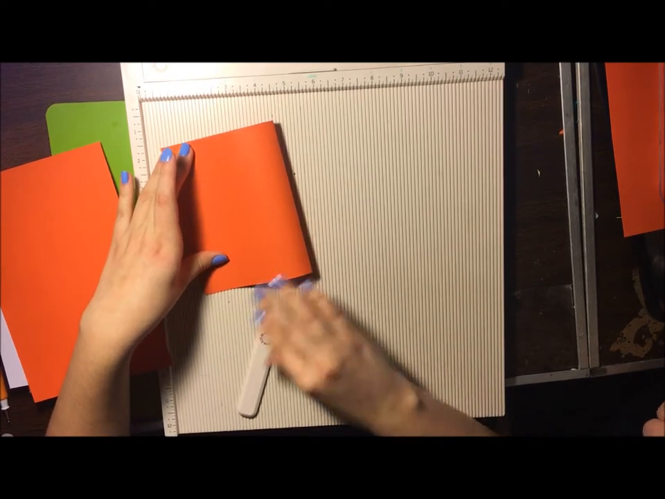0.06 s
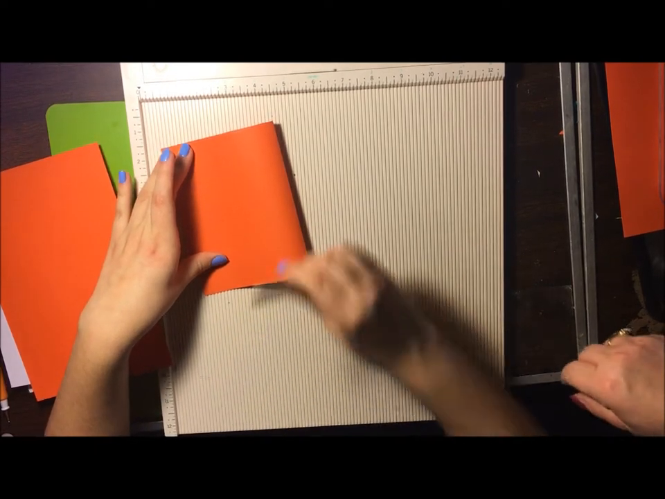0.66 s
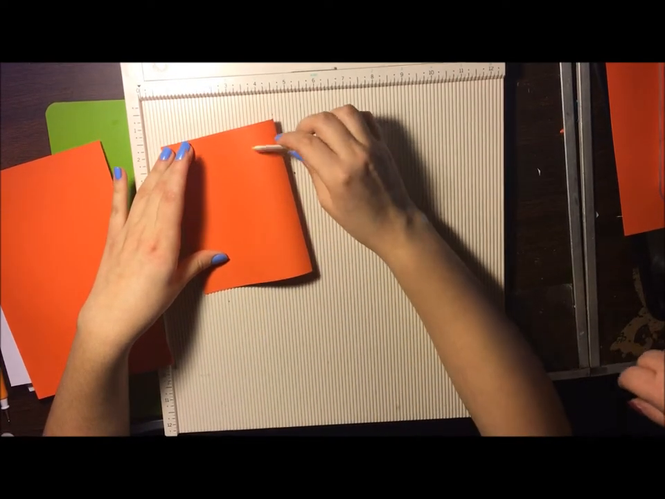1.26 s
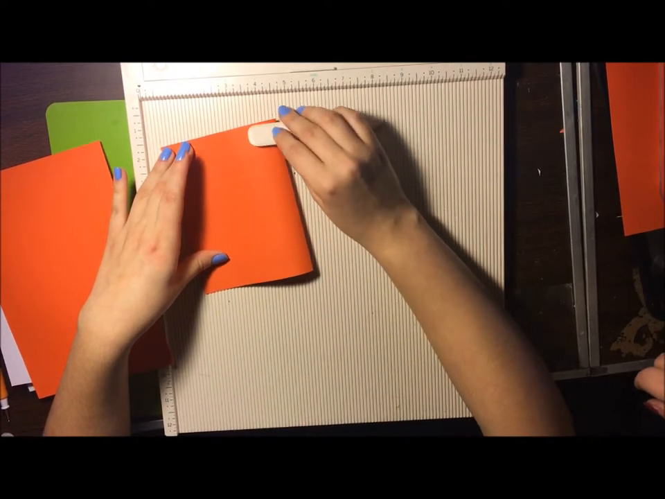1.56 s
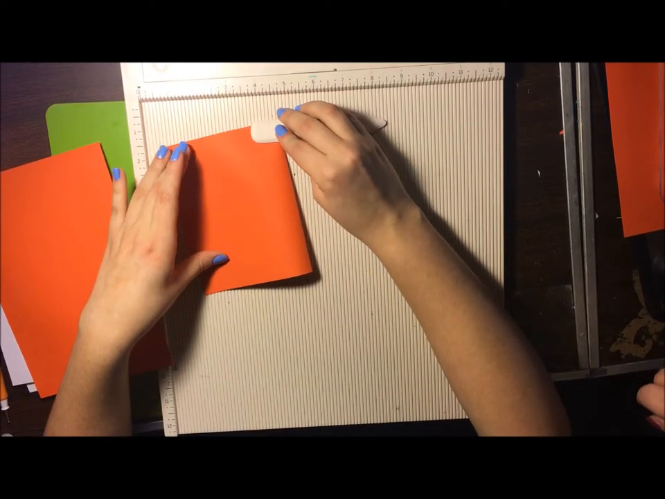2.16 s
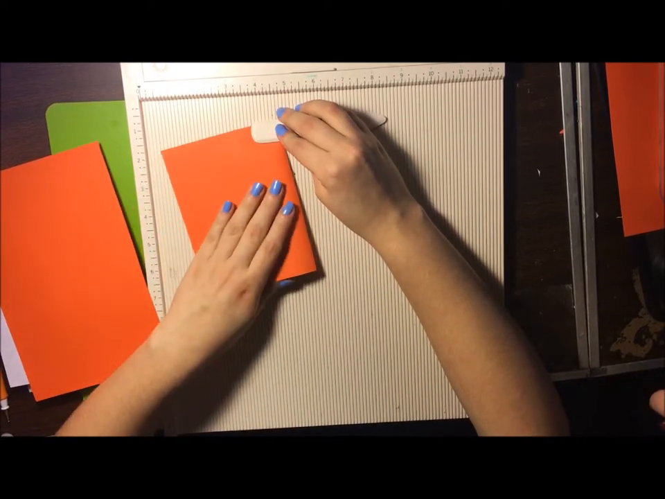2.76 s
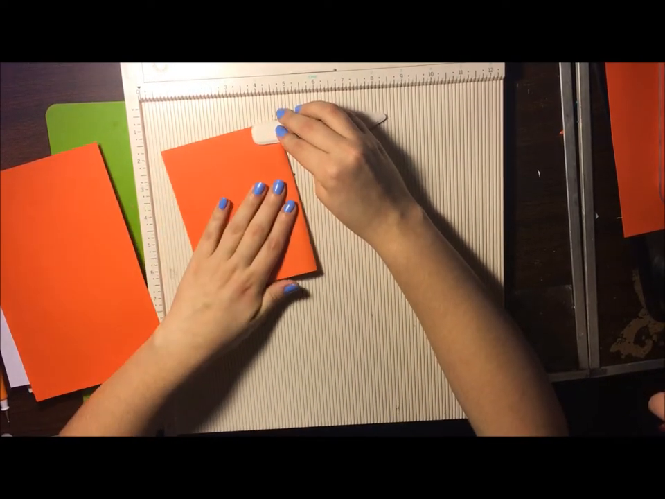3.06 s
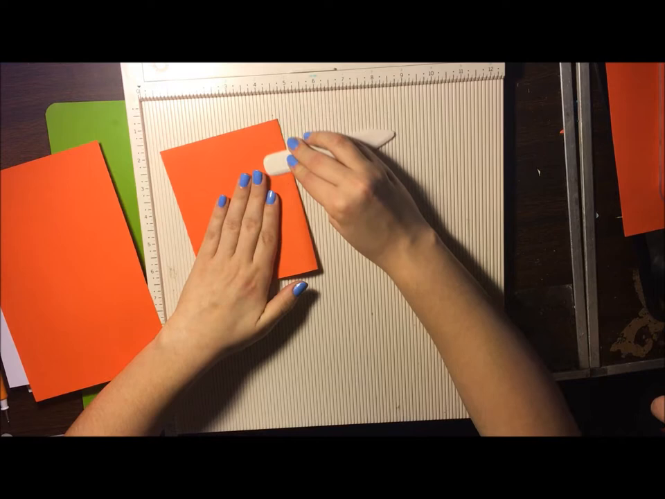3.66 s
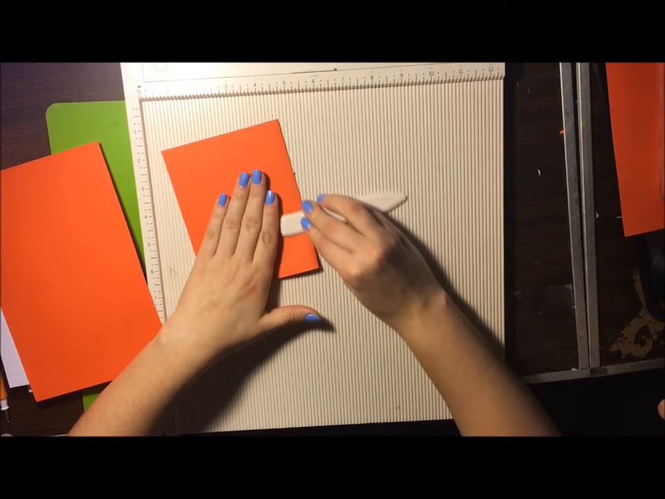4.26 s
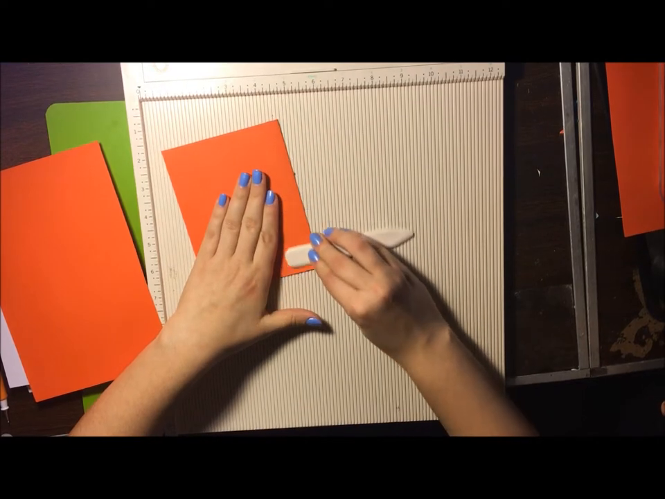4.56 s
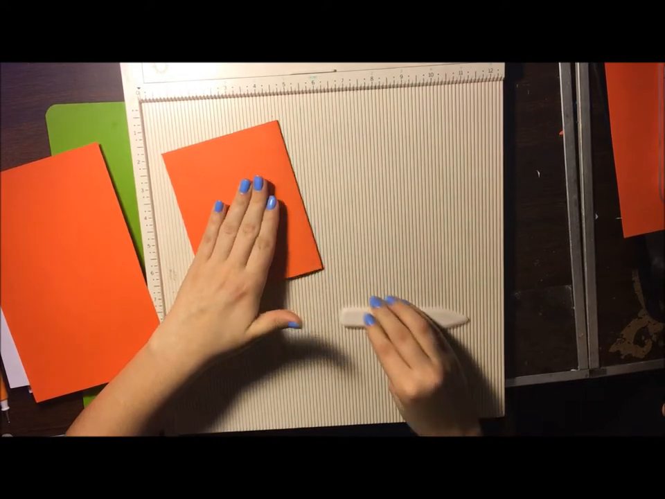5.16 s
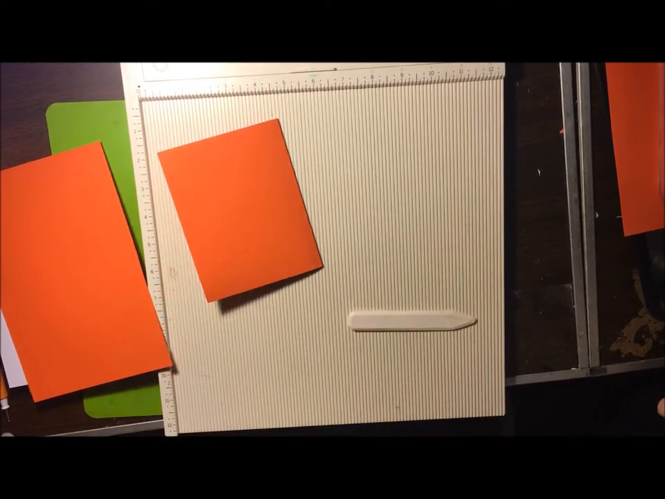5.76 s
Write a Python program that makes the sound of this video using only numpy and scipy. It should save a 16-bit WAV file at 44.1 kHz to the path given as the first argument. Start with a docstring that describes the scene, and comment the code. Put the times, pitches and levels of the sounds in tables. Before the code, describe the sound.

In the first 0.7 seconds fingers brush cardstock, and a bone folder clicks, scrapes and skids as it is lifted off a ribbed plastic board, with a tiny fingernail zip. Around 1.1 seconds come several hollow knocks with soft table thumps, one sharp and loudest, followed by short scrapes and a tap until 1.6. From there to about 3 seconds, hands slide over the card in dry swishes among faint ticks. From 3.2 to 5 seconds the folder is drawn along the crease in one soft, hissing rub, and the fold snaps once at 4 seconds. Near 4.9 the tool slips off the card and knocks the board. It scrapes and skids briefly, then is laid down with two clicks at 5.3. A faint tick follows at 5.7. The microphone is close, in a small room with a low rumble and faint electrical hum.

```python
"""Fingers brush card, then a bone folder clicks and scrapes as it is lifted off a ribbed plastic board.
It is knocked down beside a folded card and drawn along the crease, hissing; the fold snaps once.
The hollow scoring board rings under every knock and scrape, and hands slide on the cardstock.
At the end the folder slips off the card's edge and is laid down.
One microphone close to the table, in a small room with a low rumble and mains hum."""
import sys
import numpy as np
from scipy import signal
from scipy.fft import rfft, irfft
from scipy.io import wavfile
from scipy.ndimage import uniform_filter1d, map_coordinates

SR = 44100
rng = np.random.default_rng(int(sys.argv[2]) if len(sys.argv) > 2 else 0)


def dump(signal):
    """Clip the signal to [-1, 1] and save it as 16-bit WAV at the path in sys.argv[1]."""
    limited = np.clip(np.atleast_2d(signal).T, -1, 1)
    pcm = np.round(limited * 32767).astype(np.int16)
    wavfile.write(sys.argv[1], SR, pcm)


N = 264952
TAPS = 4096  # filter length in samples
HZ = np.fft.rfftfreq(TAPS, 1 / SR)
TIME = np.arange(N) / SR

# spectrum of the room tone: frequency_hz, relative_db
ROOM_AIR = [(15, -67.5), (25, -30), (49, -11.5), (86, -4.5), (116, -5), (164, -9), (188, -18.5),
            (281, -19.5), (445, -25), (804, -26.5), (871, -33), (945, -27.5), (3090, -34.5), (3440, -37.5),
            (15500, -46.5)]
# mains hum: pitch_hz, level_db
MAINS_HUM = [(61, -60), (120, -60.5)]
# first reflections off the table and things near it: delay_s, relative_gain
REFLECTIONS = [(.0016, 0.11), (.0094, 0.06), (0.0129, 0.22), (0.0256, 0.16)]
# decay of the small room: frequency_hz, t60_s
ROOM_DECAY = [(150, 0.47), (700, 0.2), (2000, 0.15), (6000, 0.13), (15000, 0.12)]
# dense floor of the board's response: frequency_hz, relative_db
BOARD_FLOOR = [(60, -18.5), (150, -16), (300, -10.5), (450, -13), (560, -3.5), (900, -1.5), (1900, -2.5),
               (3000, -11), (4900, -16), (6000, -16), (9500, -22), (10400, -24.5), (12500, -27.5),
               (16000, -38.5)]
# resonances of the board: pitch_hz, width_hz, above_floor_db
BOARD_RESONANCES = [(206, 53, 5), (359.6, 28, 13.5), (559, 4.5, 12), (630.3, 50, 14.5), (681, 38, 11),
                    (833, 68, 3), (942, 24, 11.5), (1150, 47, 9.5), (1310, 150, 7), (1508, 29, 5),
                    (1700, 22, 3), (1753, 64, 8), (1897, 57, 10), (2106, 130, 4), (2320, 360, 4.5),
                    (2680, 29, 8.5), (3480, 680, 6.5), (4370, 110, 8), (5640, 310, 4), (6570, 320, 4),
                    (8400, 330, -0.5), (9740, 350, 0)]
# the table giving under hand and tool: start_s, peak_db, pitch_hz, rise_s
TABLE_THUMPS = [(0.229, -39.5, 61, 0.019), (0.268, -41, 125.4, 0.0099), (0.287, -48.5, 354, 0.019),
                (0.975, -41, 54.6, 0.027), (1.059, -38, 70, 0.013), (1.149, -44.5, 198, .008),
                (3.595, -43, 71, 0.014), (4.884, -29.5, 219, 0.0056), (4.888, -40, 128, 0.011)]
# skin and card sliding over each other, and at 5.712 s the card springing back with a bright tick: start_s,
# length_s, end_level_db, swell_db, tilt_db_per_octave
CARD_TOUCHES = [(0, 0.095, -63, -10, -3.5), (.9, 0.024, -56, 7.5, -5), (1.654, 0.085, -60, 11.5, -2.5),
                (1.997, 0.022, -57, 3, -5.5), (2.221, 0.061, -65.5, -3, -2), (2.288, 0.039, -54, 1, -3.5),
                (2.337, 0.2, -52.5, 2, -2), (2.54, 0.19, -64, 2, -3), (2.82, 0.031, -71, 3, -1),
                (2.907, 0.045, -53, 10, -2), (3.498, 0.12, -60, -6, 0), (4.999, 0.074, -47.5, 10.5, -2.5),
                (5.071, 0.13, -55.5, -2, -3.5), (5.712, .006, -47.5, 0, 4.5)]
# hiss of paper fibres under a fingertip: frequency_hz, relative_db
FIBRE_HISS = [(300, -14), (700, -6.5), (1300, -3), (2000, 2), (3000, 1.5), (5000, -3), (6500, -1.5),
              (9700, -4), (10400, -9), (12500, -2), (15500, -11)]
# a fingernail running along folder or card: start_s, length_s, end_level_db, swell_db
NAIL_ZIPS = [(0.62, 0.0051, -61, 0), (0.637, 0.011, -51, -1), (0.648, 0.0099, -44.5, 3),
             (5.048, 0.164, -56, 0)]
# thin, sharp spectrum of the nail's zip: frequency_hz, relative_db
NAIL_COLOUR = [(400, -41), (1300, -6.5), (2300, -2.5), (2800, -11), (3600, 1), (4080, 5), (4900, -12),
               (7200, -17), (8600, -5.5), (10700, -8), (12300, -3), (15500, -15)]
# the folder skidding flat on the board: start_s, length_s, end_level_db, swell_db
FLAT_SKIDS = [(0.473, 0.012, -38, 16), (5.15, 0.11, -45.5, 17), (5.31, 0.015, -43.5, -9)]
# the folder's edge on the bare board: start_s, length_s, end_level_db, swell_db, bite_db (treble lift)
EDGE_SCRAPES = [(0.191, 0.061, -56, 7, 1), (.259, 0.094, -45.5, 2.5, -7), (.348, 0.061, -35, 15, -1.5),
                (0.476, 0.018, -32.5, 20, -9.5), (1.241, 0.047, -35, 15, -18.5),
                (1.297, 0.02, -43, 8, -11.5), (1.319, 0.029, -58.5, 6, 10), (1.467, .028, -40.5, 9, -13),
                (1.51, 0.094, -37, 9, -16), (4.983, 0.017, -46, 4, -17), (5.059, 0.16, -45, 6.5, -6),
                (5.213, 0.082, -49.5, 7, -6.5), (5.309, .026, -41, -7, -2.5)]
# knocks of folder and nails, and their tint: start_s, level_db, thud_db, hollow_db, edge_db
BOARD_KNOCKS = [(.03, -55, 30, 3.5, 2), (0.051, -54.5, 25, -7.5, 7), (0.186, -57.5, 30, -2, 1),
                (.2856, -37, 5, -4, 11.5), (0.2877, -39.5, 16, -0.5, -1), (.911, -59.5, 26, -3, 0),
                (1.0545, -30, 14, -16, 2.5), (1.07, -50, 19, -7, 13), (1.1097, -47.5, 25, -8, 7),
                (1.1467, -22.5, 0.5, -4.5, -2), (1.17, -40.5, 7, -6, -3), (1.4094, -35, -1, -0.5, -1.5),
                (1.456, -54.5, 0, -7, 7), (1.875, -52, 19, -10.5, -2), (1.903, -72, 21, 13.5, -5),
                (2.045, -55, 19, -13, -5.5), (2.182, -66.5, 23, 0, 13.5), (2.193, -57.5, 8, -21, 4),
                (2.2963, -47.5, 7, -39, -7), (2.489, -62.5, 28.5, 20.5, 12), (2.5237, -48, 14, -15, 6),
                (3.2528, -53.5, 24, -9, -27), (3.509, -64, 32, 18, 12), (4.0348, -34, -12, -18, -21),
                (4.8494, -45, -26, -1.5, -9), (4.8845, -34.5, 12.5, 2.5, 12.5), (5.308, -38, -1, -17, 2),
                (5.326, -37.5, -4, -1.5, -9), (5.713, -58, 15, -6.5, 17.5)]
# short ring of the card as the fold gives: pitch_hz, level_db, t60_s
FOLD_RING = [(1700, -29, 0.022), (2730, -24, 0.012), (3100, -35, 0.017)]
# effort of the long stroke down the crease: time_s, level_db
CREASE_EFFORT = [(3.19, -75.5), (3.39, -60.5), (3.47, -64.5), (3.55, -60), (3.9, -55), (4.122, -58),
                 (4.33, -51.5), (4.7, -57.5), (4.858, -55), (5.03, -58.5)]
# rubbing that the crease feeds into the board: frequency_hz, relative_db
CREASE_RUB = [(100, 15), (400, -0.5), (560, -4), (655, 0.5), (900, -5), (1400, -2), (1800, -0.5),
              (2100, -0.5), (3000, 0), (5000, 5.5), (9000, -4), (16000, 1)]
# hiss that the crease sends straight into the air: frequency_hz, relative_db
CREASE_AIR = [(500, -10), (2000, 3.5), (3500, 3.5), (4400, -6), (4950, -9.5), (5600, 0), (7600, -1),
              (9000, -2), (9700, 1.5), (10400, -7.5), (11400, -0.5), (13000, -5.5), (15500, -7)]


def amp(db):
    """Decibels to gain."""
    return 10 ** (np.asarray(db) / 20)


def unit(x):
    """Scales to an rms of 1."""
    return x / np.sqrt(np.mean(x ** 2) + 1e-20)


def curve(points, hz):
    """Joins (frequency_hz, value) points by lines on a log-frequency axis."""
    point_hz, value = np.transpose(sorted(points))
    return np.interp(np.log(hz + 1), np.log(point_hz + 1), value)


def causal(gain):
    """The impulse response of least delay that has this gain at HZ."""
    log_gain = np.log(np.maximum(gain, gain.max() * 1e-5))
    mirrored = np.concatenate([log_gain, log_gain[-2:0:-1]])
    return np.fft.ifft(np.exp(np.conj(signal.hilbert(mirrored)))).real


def colour(x, gain):
    """Passes x through a body with this gain; rms 1."""
    return unit(signal.oaconvolve(x, causal(gain))[:len(x)])


def stroke(time_s, level_db):
    """Envelope of one long stroke, silent outside it."""
    return uniform_filter1d(amp(np.interp(TIME, time_s, level_db, left=-200, right=-200)), size=90)


def push(start_s, length_s, end_db, swell_db, release_s, grip_s=0.0044, arch=2.06):
    """Envelope of one sliding move: it takes hold, arches to its end level and lets go."""
    t = np.arange(0, length_s + 8 * release_s, 1 / SR)
    to_go = np.maximum(1 - t / length_s, 0)
    grip = np.minimum(t / grip_s, 1)
    release = np.exp(-np.maximum(t - length_s, 0) / release_s)
    shape = grip * amp(end_db - swell_db * to_go ** arch) * release
    gain = np.zeros(N)
    span = gain[round(start_s * SR):][:len(t)]
    span += shape[:len(span)]
    return gain


def slips(per_s, spread_db, smooth):
    """Friction: tiny random slips of uneven size over a share of even rubbing noise."""
    size = amp(spread_db * np.minimum(rng.exponential(1, N), 4))
    train = size * rng.choice([-1, 1], N) * (rng.random(N) < per_s / SR)
    return unit(unit(train) + smooth * rng.standard_normal(N))


def wander(x, depth_db, patch_hz, patch_s):
    """As the contact point travels, different bands are favoured for a moment."""
    hz, t, spectra = signal.stft(x, SR, nperseg=512, noverlap=384)
    grid = np.meshgrid(hz / patch_hz, t / patch_s, indexing="ij")
    patches = map_coordinates(rng.standard_normal((128, 256)), grid, order=1, mode="mirror")
    spectra *= amp(depth_db * unit(patches))
    return unit(signal.istft(spectra, SR, nperseg=512, noverlap=384)[1][:N])


def room_tone(air_db=-56.5, waver_rad=0.093):
    """Rumble and faint hiss all round the microphone, with a slightly wavering mains hum."""
    hz = np.fft.rfftfreq(N, 1 / SR)
    air = unit(irfft(rfft(rng.standard_normal(N)) * amp(curve(ROOM_AIR, hz)), N))
    drift = unit(irfft(rfft(rng.standard_normal(N)) * (hz < 5), N))
    hum = sum(amp(db) * unit(np.sin(2 * np.pi * (pitch_hz * TIME + rng.random()) + waver_rad * drift))
              for pitch_hz, db in MAINS_HUM)
    return amp(air_db) * air + hum


def small_room(x, wet_db=-7.0, build_s=0.0008):
    """At the microphone: direct sound, near reflections and a short tail that dies sooner in the treble."""
    hz, t, spectra = signal.stft(rng.standard_normal(SR // 2), SR, nperseg=256)
    decay = amp(-60 * t / curve(ROOM_DECAY, hz)[:, None])
    tail = signal.istft(spectra * decay, SR, nperseg=256)[1]
    tail *= 1 - np.exp(-np.arange(len(tail)) / SR / build_s)
    response = amp(wet_db) * tail / np.linalg.norm(tail)
    response[0] = 1
    dull_echo = signal.windows.hann(9) / 4  # cluttered surfaces throw back little treble
    for delay_s, gain in REFLECTIONS:
        response[round(delay_s * SR):][:9] += gain * dull_echo
    return signal.oaconvolve(x, response)[:N]


def table_thumps():
    """Low, heavily damped swings of the table and the board's shell."""
    out = np.zeros(N)
    for start_s, peak_db, pitch_hz, rise_s in TABLE_THUMPS:
        t = np.maximum(TIME - start_s, 0)
        envelope = amp(peak_db) * t / rise_s * np.exp(1 - t / rise_s)
        out += envelope * np.sin(2 * np.pi * pitch_hz * t)
    return out


def card_touches(trim_db=-1):
    """Fingers brush and shift the card: a dry, fine swish, brighter or duller from move to move; once the card
    springs back with a bright tick."""
    friction = slips(per_s=2000, spread_db=2, smooth=0.66)
    fibre_db = curve(FIBRE_HISS, HZ)
    octaves = np.log2((HZ + 1) / 4000)
    out = np.zeros(N)
    for start_s, length_s, end_db, swell_db, tilt in CARD_TOUCHES:
        gain = push(start_s, length_s, end_db + trim_db, swell_db, release_s=0.009)
        moving = gain > 0
        out[moving] += gain[moving] * colour(friction[moving], amp(fibre_db + tilt * octaves))
    return out


def nail_zips():
    """A fingernail makes a quick run of tiny slips with a narrow ring."""
    zipping = colour(slips(per_s=1000, spread_db=-1, smooth=0.27), amp(curve(NAIL_COLOUR, HZ)))
    return zipping * sum(push(*move, release_s=0.0055) for move in NAIL_ZIPS)


def board_response():
    """Gain of the hollow plastic board: resonances standing on a dense floor."""
    peaks = sum((amp(db) ** 2 - 1) / (1 + (2 * (HZ - pitch_hz) / width_hz) ** 2)
                for pitch_hz, width_hz, db in BOARD_RESONANCES)
    return amp(curve(BOARD_FLOOR, HZ)) * np.sqrt(np.maximum(1 + peaks, 0.1))


def board_scatter(x, spread_s=0.00198, grain_hz=1078):
    """Bending waves cross the board by many paths, so each band arrives with its own small delay."""
    anchors_hz = np.arange(0, SR / 2, grain_hz)
    delay_s = spread_s * np.interp(HZ, anchors_hz, rng.random(TAPS)[:len(anchors_hz)])
    paths = irfft(np.exp(-2j * np.pi * np.cumsum(delay_s) * HZ[1]))[:TAPS // 2]
    return signal.fftconvolve(x, paths)[:len(x)]


def folder_skids(pitch_hz=1420, width_hz=260):
    """Sliding on its flat side, the folder stutters and sings close to one pitch."""
    resonance = 1 / (1 + (2 * (HZ - pitch_hz) / width_hz) ** 2)
    song = colour(slips(per_s=460, spread_db=-2.0, smooth=0.16), resonance)
    return song * sum(push(*move, release_s=0.02) for move in FLAT_SKIDS)


def folder_scrapes(grind_hz=1400, rasp_hz=2400, grind_per_bite=0.29, usual_bite_db=-14):
    """The folder's edge stutters over the ribs: the board groans; a sharper bite adds grind, then rasp."""
    friction = slips(per_s=1100, spread_db=-2, smooth=0.39)
    board = board_response()
    below_grind, below_rasp = (1 / (1 + (HZ / hz) ** 10) for hz in (grind_hz, rasp_hz))  # power shares
    groan = colour(friction, board * np.sqrt(below_grind))
    grind = colour(friction, board * np.sqrt((1 - below_grind) * below_rasp))
    rasp = colour(friction, board * np.sqrt(1 - below_rasp))
    rasp = wander(rasp, depth_db=1.0, patch_hz=443, patch_s=0.13)
    out = np.zeros(N)
    for start_s, length_s, end_db, swell_db, bite_db in EDGE_SCRAPES:
        body = amp(-3) * groan + amp(-5 + grind_per_bite * (bite_db - usual_bite_db)) * grind
        out += body * push(start_s, length_s, end_db, swell_db, release_s=0.0098)
        # the rasp builds later and dies sooner
        out += rasp * push(start_s, length_s, end_db + bite_db - 3, swell_db + 3, release_s=0.007)
    return out


def board_knocks(chatter_s=0.0043, firm_db=-29.5, firm_looseness=0.48, looseness_per_db=0.022):
    """Each blow rings the board, coloured by where it lands; a light, loose contact chatters more."""
    board = board_response()
    middle = (HZ > 1200) & (HZ < 3500)
    board /= np.sqrt(np.sum(board[middle] ** 2) / len(HZ))
    blow = np.sqrt(0.015 * SR)  # a knock's level is its mid-band rms over 15 ms
    t = np.arange(TAPS) / SR
    out = np.zeros(N + 2 * TAPS)
    for start_s, level_db, thud_db, hollow_db, edge_db in BOARD_KNOCKS:
        tint_db = curve([(181, thud_db), (650, hollow_db), (2050, 0), (7900, edge_db)], HZ)
        ring = causal(board * amp(level_db + tint_db))
        looseness = np.clip(firm_looseness + looseness_per_db * (firm_db - level_db), 0, 1)
        chatter = rng.standard_normal(TAPS) * np.sqrt(t) * np.exp(-t / (chatter_s * looseness))
        contact = np.sqrt(looseness) * chatter / np.linalg.norm(chatter)
        contact[0] = np.sqrt(1 - looseness)  # the clean first strike
        knock = blow * board_scatter(signal.fftconvolve(contact, ring))
        out[round(start_s * SR):][:len(knock)] += knock
    return amp(0) * out[:N]


def fold_snap(start_s=4.036):
    """The stiff fold buckles once under the folder and the card rings briefly."""
    t = np.maximum(TIME - start_s, 0)
    return sum(amp(db - 60 * t / t60_s) * np.sin(2 * np.pi * hz * t) for hz, db, t60_s in FOLD_RING)


def crease_stroke(usual_hiss_db=-60, usual_effort_db=-55.0, hiss_per_effort=1.13):
    """Smooth bone on card: fibre slips hiss in the air and murmur in the board, following the effort."""
    time_s, effort_db = np.transpose(CREASE_EFFORT)
    through_board = board_response() * amp(curve(CREASE_RUB, HZ))
    murmur = colour(slips(per_s=5400, spread_db=4, smooth=0.43), through_board)
    hiss = colour(slips(per_s=6000, spread_db=3.5, smooth=0.53), amp(curve(CREASE_AIR, HZ)))
    hiss = wander(hiss, depth_db=0.5, patch_hz=373, patch_s=0.14)
    hiss_db = usual_hiss_db + hiss_per_effort * (effort_db - usual_effort_db)
    return murmur * stroke(time_s, effort_db) + hiss * stroke(time_s, hiss_db)


def scene():
    """The work on the table, heard from close by through one microphone, over the room tone."""
    folder = board_knocks() + folder_scrapes() + folder_skids() + crease_stroke() + fold_snap()
    hands = card_touches() + nail_zips()
    return (small_room(folder + hands) + table_thumps() + room_tone())[None]


def record(dry, cutoff_hz=15850):
    """A steep treble cut on the microphone's signal."""
    lowpass = signal.firwin(511, cutoff_hz, window=("kaiser", 9), fs=SR)
    return signal.oaconvolve(dry, lowpass[None], "same")


dry = scene()
out = record(dry)
dump(out)
```